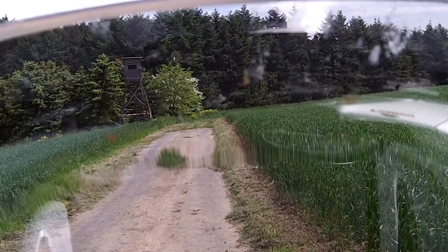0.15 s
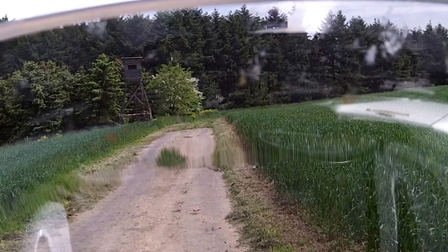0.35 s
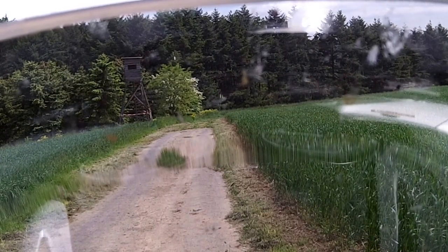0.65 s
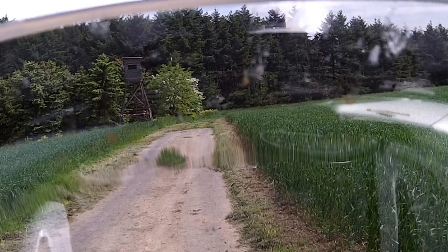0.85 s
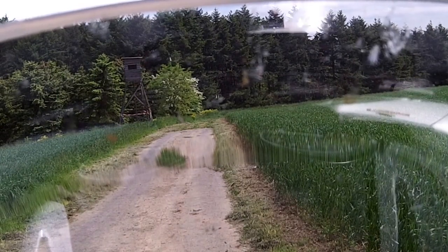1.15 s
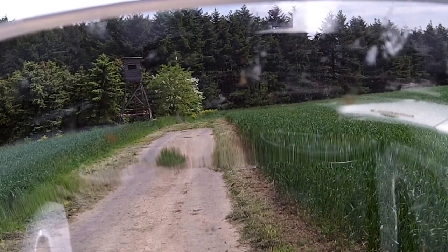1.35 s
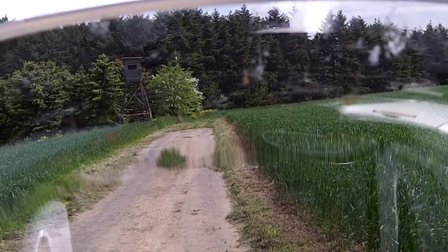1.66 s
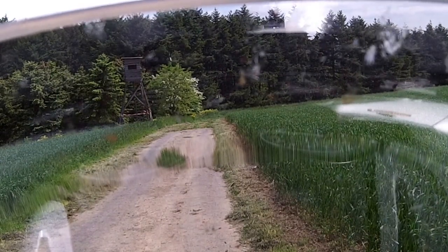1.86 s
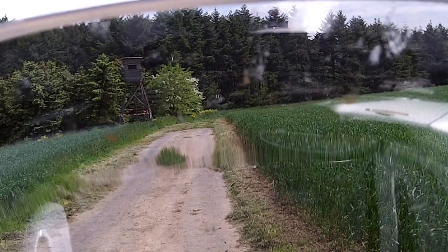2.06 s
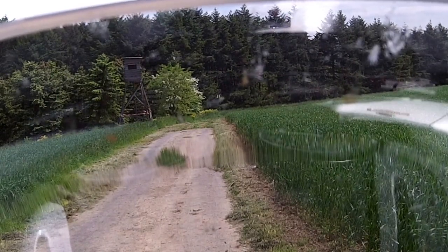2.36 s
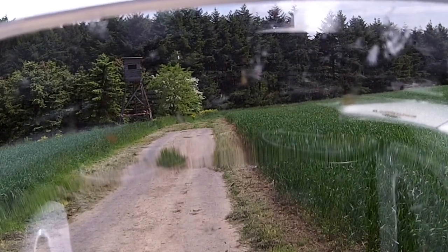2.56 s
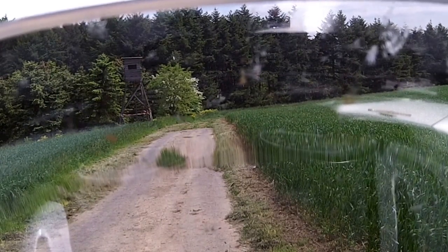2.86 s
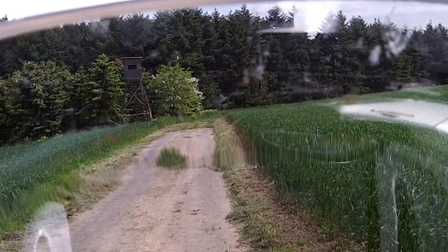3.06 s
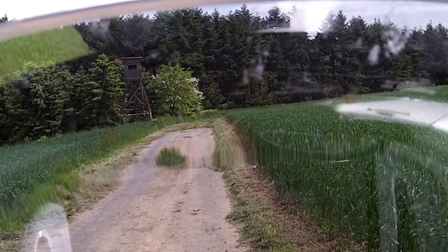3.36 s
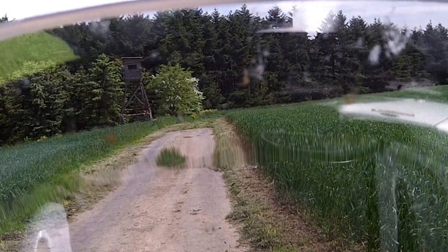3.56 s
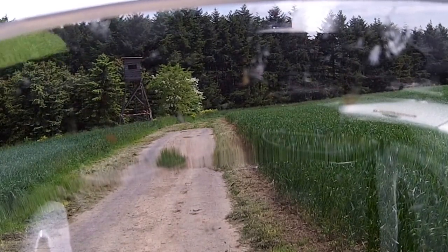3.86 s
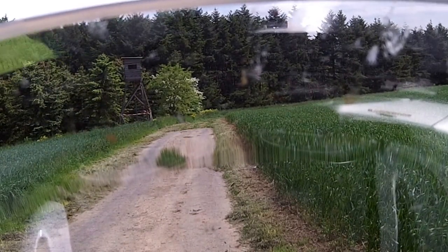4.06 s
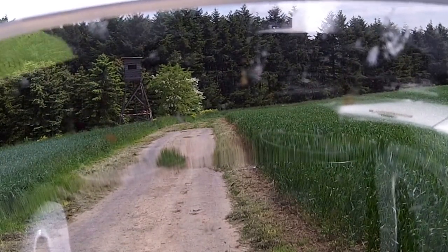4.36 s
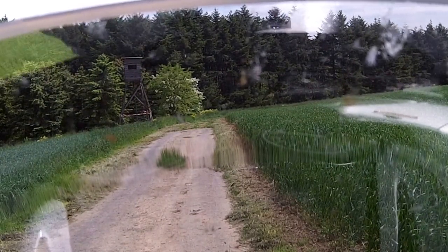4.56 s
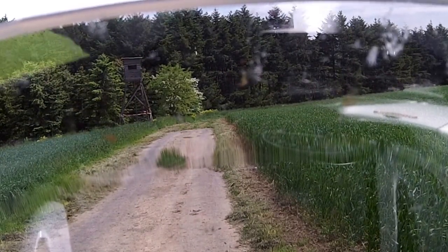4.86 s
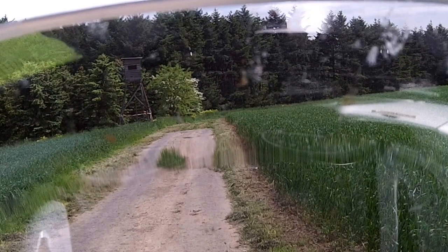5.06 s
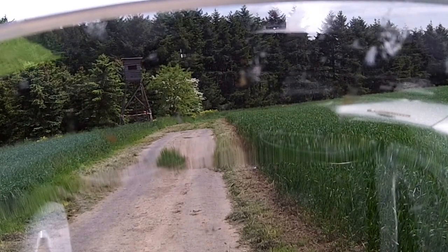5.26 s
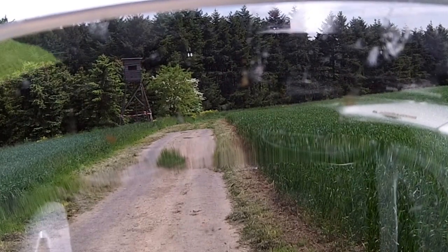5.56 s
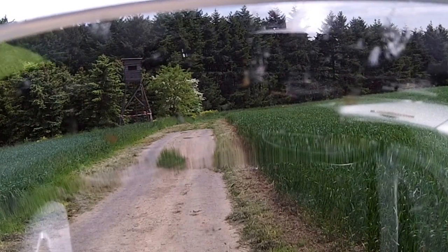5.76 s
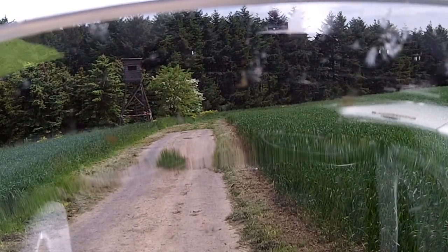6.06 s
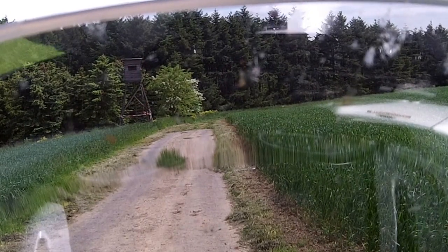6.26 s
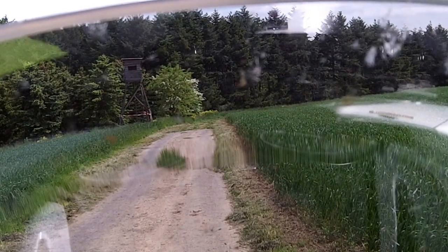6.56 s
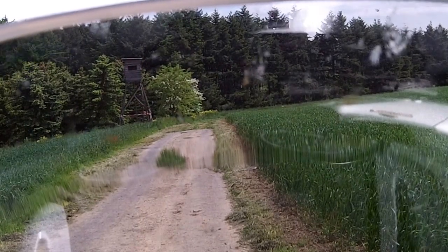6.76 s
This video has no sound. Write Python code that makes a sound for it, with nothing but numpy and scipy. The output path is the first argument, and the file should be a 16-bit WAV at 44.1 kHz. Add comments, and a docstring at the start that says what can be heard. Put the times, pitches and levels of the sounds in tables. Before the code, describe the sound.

A droning motorcycle idle shuts off at a third of the way, a second bike thumps and whines on, then clicks, knocks and near quiet.

```python
"""Three motorcycles idle on a field track, heard through a helmet intercom microphone.
From the start a four-cylinder drones with even pulses through ringing pipes, the rider's twin thumps and
clatters, its fuel pump whines as a set of tones, and a third bike putters softly far away.
The four is switched off and coasts down in gear rattle and thin hiss; the pump squeals in spells.
Knocks and clicks of filtered noise follow, the twin stops too amid more of them, and the far bike putters on."""
import sys
import numpy as np
from scipy import signal
from scipy.fft import rfft, irfft
from scipy.io import wavfile
from scipy.ndimage import uniform_filter1d

SR = 44100
rng = np.random.default_rng(int(sys.argv[2]) if len(sys.argv) > 2 else 0)


def unload_wav(signal):
    """Save mono or channel-first audio to the path in sys.argv[1] as 16-bit WAV at rate SR, clipped to [-1, 1]."""
    wavfile.write(
        sys.argv[1],
        SR,
        np.round(np.clip(np.atleast_2d(signal).T, -1, 1) * 32767).astype(np.int16),
    )


N = 305172
T = np.arange(N) / SR  # time of every sample [s]


def amp(db):
    """Turns decibels into a gain."""
    return 10 ** (np.asarray(db) / 20)


def unit(x):
    """Scales a signal to an rms of 1."""
    return x / np.sqrt(np.mean(x ** 2) + 1e-20)


def curve(rows):
    """Joins rows of (time [s], value) by straight lines."""
    return np.interp(T, *np.transpose(rows))


def since(s):
    """Seconds after a moment, zero before it."""
    return np.maximum(T - s, 0)


def bursts(rows):
    """Smooth swells from rows of (time [s], length [s], level [dB]); overlaps add as power."""
    power = 0
    for s, length, db in rows:
        swell = amp(db) * np.exp(-((T - s) / (length / 2)) ** 2)
        power = power + swell ** 2
    return np.sqrt(power)


def noise():
    """White noise: all pitches equally strong."""
    return rng.standard_normal(N)


def wander(rate_hz, size=8192):
    """A random drift of rms 1; changes much faster than rate_hz are smoothed away."""
    hz = np.fft.rfftfreq(size, T[-1] / size)
    spectrum = rfft(rng.standard_normal(size)) * np.exp(-(hz / rate_hz) ** 2)
    slow = irfft(spectrum)
    return unit(np.interp(T, np.linspace(0, T[-1], size), slow))


def colour(x, points, size=16384):
    """A filter with the given spectrum that looks only backwards, so every blow rings after its onset."""
    f, db = np.transpose(points)
    hz = abs(np.fft.fftfreq(size, 1 / SR))
    log_gain = np.log(amp(np.interp(np.log(hz + 1), np.log(f), db)))
    minimum_phase = np.exp(np.conj(signal.hilbert(log_gain)))
    ring = np.fft.ifft(minimum_phase).real[:size // 2]
    return signal.oaconvolve(x, ring)[:N]


def resonate(x, hz, width, db):
    """One resonance of the given width [Hz], struck by x and set to an rms level [dB]."""
    pole = np.exp((2j * np.pi * hz - np.pi * width) / SR)
    return amp(db) * unit(signal.lfilter([1], [1, -pole], x).imag)


def beats(turns, spread_db, jitter=0):
    """One click at each whole turn, uneven in strength [dB] and, by jitter [s], in time."""
    at = np.flatnonzero(np.diff(np.floor(turns)) > 0)
    strength, slip = rng.standard_normal((1000, 2))[:len(at)].T
    places = at + np.round(slip * jitter * SR).astype(int)
    clicks = np.zeros(N)
    clicks[np.clip(places, 0, N - 1)] = amp(spread_db * strength)
    return clicks


def puffs(clicks, decay_s):
    """A burst of noise that dies away after each click."""
    fading = signal.lfilter([1], [1, -np.exp(-1 / (decay_s * SR))], clicks)
    return noise() * fading


def lobe(turns, centre, width):
    """A smooth bump once a turn; centre and width are parts of a turn."""
    return np.exp((np.cos(2 * np.pi * (turns - centre)) - 1) / (2 * np.pi * width) ** 2)


# hunting idle of the four: (time [s], firing rate [pulses/s])
FOUR_IDLE = [(0, 44.24), (0.1, 45.59), (0.22, 43.75), (0.33, 45.15), (0.52, 43.42), (0.65, 45.12),
             (0.78, 44.22), (1.0, 43.04), (1.17, 44.94), (1.33, 43.83), (1.45, 45.37), (1.56, 43.94),
             (1.65, 45.66), (1.76, 42.72), (1.9, 45.53), (2.04, 43.62), (2.3, 45.34)]
FOUR_OFF_S, FOUR_COAST_S = 2.304, 0.62  # ignition cut; time constant of the slowing crank


def four_turns():
    """Counts the four's firing cycles: idle, then a crank that slows exponentially."""
    coasting = np.exp(-since(FOUR_OFF_S) / FOUR_COAST_S)
    return .215 + np.cumsum(curve(FOUR_IDLE) * coasting) / SR


# sound of the four's exhaust pipe: (frequency [Hz], relative level [dB])
FOUR_PIPE_SPECTRUM = [(12, -6), (25, 0.5), (44, 2), (89, -2.5), (133, -8.5), (178, -10.5), (222, -15),
                      (310, -14), (360, -25.5), (450, -24), (600, -36.5), (1500, -99), (5000, -110)]
# silencer note, struck by every second pulse: (frequency [Hz], width [Hz], level [dB])
SILENCER_RING = (202, 34, -37)
# tailpipe notes, struck by every pulse: (frequency [Hz], width [Hz], level [dB])
TAILPIPE_RINGS = [(307.2, 25, -41.5), (355.6, 14, -51.5), (417, 18, -48)]
# moments when a few strokes burble: (time [s], length [s], level [dB])
BURBLE_SWELLS = [(1.04, .07, -41), (1.68, 0.037, -36), (1.81, .04, -44)]
# the note of the burble: (frequency [Hz], width [Hz])
BURBLE_NOTE = (350, 110)
# sound of the steady rasp: (frequency [Hz], relative level [dB])
RASP_SPECTRUM = [(60, -23), (250, 13.5), (500, 3), (900, 1.5), (1700, 4), (2300, 3.5), (3000, -4.5),
                 (4200, -7.5), (5500, -19), (7500, -57.5)]
# brief swells of the rasp: (time [s], length [s], level [dB])
RASP_BURSTS = [(.19, 0.087, -40), (.52, 0.038, -38), (.72, 0.09, -38), (1.01, 0.097, -37)]
# sound of those swells, brighter than the steady rasp: (frequency [Hz], relative level [dB])
RASP_BURST_SPECTRUM = [(100, 0), (400, 6), (900, 1), (2000, 7), (3000, -2), (4200, -2.5), (5500, -12),
                       (7500, -25)]
FOUR_DB, FOUR_FADE_DB_PER_S = -20, 91  # pipe level, and its fade after the ignition cut
FIRE_OUT_S, RASP_DB = 0.0046, -39  # time constant of the fire going out; steady rasp


def four(pump_hz=150, rasp_depth=0.56, flow_db=-39, lead_share=0.66):
    """Even exhaust pulses ring the pipe, silencer and tailpipe; each carries a puff of rasp."""
    turns, off = four_turns(), since(FOUR_OFF_S)
    level, fire = amp(FOUR_DB - FOUR_FADE_DB_PER_S * off), np.exp(-off / FIRE_OUT_S)
    clicks = beats(turns, spread_db=.9, jitter=.00015)
    running = T < FOUR_OFF_S

    rumble_cut = signal.butter(1, 5, "high", fs=SR, output="sos")
    pipe = signal.sosfilt(rumble_cut, colour(clicks, FOUR_PIPE_SPECTRUM))
    lead = lobe(turns, centre=-.11, width=0.053)  # a small push just ahead of each pulse
    pipe = pipe / pipe[running].std() + lead_share * (lead - lead.mean())
    dull = signal.butter(2, pump_hz, fs=SR, output="sos")
    pumping = signal.sosfilt(dull, pipe)  # what is left once the fire is out

    every_second = np.round(turns) % 2 == 0
    silencer = resonate(clicks * every_second, *SILENCER_RING)
    tailpipe = sum(resonate(clicks, *mode) for mode in TAILPIPE_RINGS)
    burble = bursts(BURBLE_SWELLS) * resonate(clicks, *BURBLE_NOTE, 0)

    gate = lobe(turns, centre=0.042, width=0.12)  # opens just after each pulse
    flow = amp(flow_db) * unit(colour(noise() * gate, FOUR_PIPE_SPECTRUM))  # turbulent gas in the pipe
    flicker = amp(1.1 * wander(rate_hz=40))
    rasp_gate = 1 + rasp_depth * gate
    rasp = amp(RASP_DB) * unit(colour(noise() * rasp_gate * flicker, RASP_SPECTRUM))
    rasp += bursts(RASP_BURSTS) * unit(colour(noise() * rasp_gate, RASP_BURST_SPECTRUM))

    pulses = level * (fire * pipe + (1 - fire) * pumping)
    return pulses + fire * (silencer + tailpipe + burble + flow + rasp)


# hunting idle of the twin: (time [s], firing rate [pulses/s])
TWIN_IDLE = [(0.0, 16.61), (0.07, 17.03), (0.29, 16.69), (0.55, 17.47), (0.77, 16.97), (1.09, 16.8),
             (1.17, 16.35), (1.29, 16.85), (1.43, 15.98), (1.57, 16.23), (1.69, 17.36), (1.83, 16.19),
             (1.89, 16.83), (2.17, 16.66), (2.27, 16.0), (2.43, 17.13), (2.57, 16.21), (2.77, 18.01),
             (2.91, 16.44), (3.07, 17.4), (3.21, 16.33), (3.35, 17.47), (3.49, 16.66), (3.55, 16.84),
             (3.87, 16.13), (3.97, 16.65), (4.17, 15.31), (4.23, 16.54), (4.39, 17.11), (4.47, 16.12),
             (4.63, 17.0), (4.77, 16.51), (4.85, 17.04), (5.07, 16.73), (5.35, 17.35), (5.43, 16.91),
             (5.57, 17.71), (5.71, 16.67), (5.81, 17.2), (5.95, 16.44), (6.05, 16.84), (6.13, 16.27),
             (6.29, 17.18), (6.39, 16.25)]
IDLE_HZ = 16.75  # the twin's usual firing rate
TWIN_OFF_S, TWIN_COAST_S = 6.43, 0.29  # ignition cut; time constant of the slowing crank


def twin_turns():
    """Counts the twin's firing cycles: idle, then a crank that slows exponentially."""
    coasting = np.exp(-since(TWIN_OFF_S) / TWIN_COAST_S)
    return .332 + np.cumsum(curve(TWIN_IDLE) * coasting) / SR


# sound of the twin's exhaust thump: (frequency [Hz], relative level [dB])
THUMP_SPECTRUM = [(8, -2), (17, -23), (34, 2), (50, -10.5), (67, -1), (84, 3.5), (101, -4.5), (120, -14),
                  (145, -22.5), (300, -35), (900, -77), (4000, -105)]
# a steady exhaust note: (frequency [Hz], width [Hz], relative level [dB])
TWIN_EXHAUST_RING = (438, 20, -51)
# hollow pipe notes and valve clacks in every cycle:
# (place in cycle [0-1], frequency [Hz], width [Hz], relative level [dB], roughness [noise per click])
CYCLE_BLOWS = [(0.07, 447.4, 40, -50, 0.45), (0.41, 275, 55, -49.5, 0.44), (0.42, 1710, 220, -59, 1),
               (.54, 1740, 220, -59.5, 1.1), (.64, 2000, 300, -58, 1), (0.84, 423, 40, -55.5, 0.47),
               (.5, 765, 49, -59.5, .8)]
# slow swell of those notes and clacks: (time [s], level [dB])
RING_LEVEL = [(0, 0), (1.0, -0.5), (2.0, 1.5), (3.0, -0.5), (3.9, -1), (4.6, -1.5), (5.1, 2), (5.7, 1.5),
              (6.4, -1.5)]
# sound of the mechanical clatter: (frequency [Hz], relative level [dB])
CLATTER_SPECTRUM = [(60, 1.5), (250, 6.5), (550, 0.5), (760, -1.5), (980, -2), (1400, -1.5), (2400, 0.5),
                    (2900, -4.5), (3400, -5), (3950, -5), (4400, -8), (5100, -9), (5700, -15.5),
                    (6400, -15), (7300, -27)]
# the dying twin sucks air through its intake: (time [s], length [s], level [dB])
INTAKE_GASPS = [(6.462, 0.042, -40.5), (6.512, 0.03, -43.5)]
# the sound of the intake: (frequency [Hz], width [Hz])
INTAKE_BAND = (2000, 720)
THUMP_DB, THUMP_FADE_DB_PER_S = -32.5, 64  # level at the usual idle, and fade after the ignition cut
CLATTER_DB, CLATTER_FADE_DB_PER_S = -41.5, 50


def twin(swish=0.55, tick_db=-9, tick_s=0.001, blow_s=0.0024, push_db=0.6):
    """Thump, hollow rings, valve clacks and clatter, louder by push_db per pulse/s of idle speed."""
    turns, off = twin_turns(), since(TWIN_OFF_S)
    fade = amp(-THUMP_FADE_DB_PER_S * off)
    clatter_level = amp(CLATTER_DB - CLATTER_FADE_DB_PER_S * off)
    push = amp(push_db * (curve(TWIN_IDLE) - IDLE_HZ))
    thump = colour(beats(turns, spread_db=.5, jitter=.0002), THUMP_SPECTRUM)

    rings = resonate(noise(), *TWIN_EXHAUST_RING)
    for place, hz, width, db, rough in CYCLE_BLOWS:
        blows = beats(turns - place, spread_db=1.5, jitter=.00015)
        strike = unit(blows) + rough * unit(puffs(blows, blow_s))
        rings = rings + resonate(strike, hz, width, db)

    ticks = puffs(beats(turns * 8, spread_db=3, jitter=.001), tick_s)  # eight in each cycle
    rub_gate = 1 + swish * lobe(turns, centre=0.55, width=0.27)
    rub = noise() * rub_gate * amp(1.35 * wander(rate_hz=34.0))
    clatter = unit(colour(unit(rub) + amp(tick_db) * unit(ticks), CLATTER_SPECTRUM))

    air = resonate(resonate(noise(), *INTAKE_BAND, 0), *INTAKE_BAND, 0)
    intake = bursts(INTAKE_GASPS) * air
    exhaust = fade * (amp(THUMP_DB) * unit(thump - thump.mean()) + amp(curve(RING_LEVEL)) * rings)
    return push * (exhaust + clatter_level * clatter) + intake


# sound of the far bike's exhaust: (frequency [Hz], relative level [dB])
FAR_SPECTRUM = [(10, -58), (21, -11), (41, -2), (80, 6), (130, -5.5), (200, -18.5), (290, -2.5), (360, -13),
                (460, -25), (1000, -56), (4000, -102)]
# sound of the open air: (frequency [Hz], relative level [dB])
AIR_SPECTRUM = [(20, 4.5), (80, 1), (200, -11), (320, -11), (450, -15.5), (1000, -23), (2600, -27),
                (5000, -36.5), (7000, -52)]
AIR_DB = -39.5
FAR_HZ, FAR_BEAT_S = 20.5, 6.764  # mean firing rate, and the moment of one of its beats


def far_bike(level_db=-43.5, drift=0.124):
    """Soft, nearly even exhaust pulses over a steady noise of open air."""
    away = np.minimum(abs(T - FAR_BEAT_S), 2)  # the beat drifts more away from the known moment
    turns = FAR_HZ * (T - FAR_BEAT_S) + drift * wander(rate_hz=1.0) * away
    putter = colour(beats(turns, spread_db=0.5, jitter=0.00061), FAR_SPECTRUM)
    air = amp(AIR_DB) * unit(colour(noise(), AIR_SPECTRUM))
    return amp(level_db) * unit(putter - putter.mean()) + air


PUMP_HZ, PUMP_PULL, PUMP_LAG_S = 133.23, 2.4, .03  # turns/s at usual idle; pull per pulse/s of idle; delay


def rotor_hz():
    """Fuel pump speed, which follows the twin's idle through the battery voltage, a little late."""
    late_idle = np.interp(T - PUMP_LAG_S, T, curve(TWIN_IDLE))
    return PUMP_HZ + PUMP_PULL * (late_idle - IDLE_HZ)


# spells of squeal: (time [s], length [s], level [dB], hold [0 a chirp each cycle to 1 a held tone])
SQUEAL_SPELLS = [(1.193, 0.036, -35.5, 0.091), (1.366, 0.16, -33.5, 0.2), (1.51, 0.15, -32.5, 0.18),
                 (1.813, 0.092, -39, .09), (2.08, 0.04, -50, .1), (2.228, .18, -34.5, 0.094),
                 (2.573, 0.084, -35.5, 0.058), (3.226, 0.03, -36.5, 0.083), (3.757, 0.25, -41.5, 0.08),
                 (4.02, 0.27, -43, 0.55), (4.082, .14, -39.5, 0.73), (4.298, 0.057, -44, .2),
                 (4.493, .14, -35.5, 0.23), (4.778, 0.095, -38.5, 0.13), (5.095, 0.051, -48, 0.092),
                 (5.962, 0.28, -44, .35), (6.363, 0.079, -49, .5)]
SQUEAL_REST_DB, SQUEAL_EDGE_S = -55.5, 0.025  # level between spells; length of each spell's ramps


def squeal_level():
    """The shrill line is faint, but in spells it rings out, strongest just before each thump."""
    dip = lobe(twin_turns(), centre=0.96, width=0.14)
    level = amp(SQUEAL_REST_DB + 4.1 * wander(rate_hz=74))
    for s, length, db, held in SQUEAL_SPELLS:
        spell = np.clip(np.minimum(T - s, s + length - T) / SQUEAL_EDGE_S + .5, 0, 1)
        level = level + amp(db) * spell * (dip + np.clip(held, 0, 1) * (1 - dip))
    return level


# lowest tone of the whine: (time [s], level [dB])
WHINE_TONE_LEVEL = [(0.0, -49), (0.3, -47), (0.42, -52), (0.57, -46), (0.68, -64), (0.8, -64), (0.88, -48),
                    (1.04, -47), (1.14, -56), (1.33, -56), (1.41, -45.5), (1.53, -57), (1.63, -60),
                    (1.7, -45), (1.77, -44), (1.88, -61), (1.99, -43), (2.06, -45), (2.11, -59),
                    (2.19, -40), (2.31, -59), (2.41, -41.5), (2.52, -50), (2.68, -42), (2.86, -54.5),
                    (3.08, -42), (3.27, -49.5), (3.66, -49.5), (3.83, -60), (4.05, -58), (4.41, -47),
                    (4.52, -53), (4.72, -58), (4.82, -51.5), (5.06, -46.5), (5.68, -51), (5.78, -58),
                    (5.93, -56), (6.08, -53), (6.16, -53), (6.24, -47), (6.42, -53)]
# its overtones: (time [s], 2nd level [dB], 3rd level [dB], 4th level [dB], 5th level [dB])
WHINE_OVERTONES = [(0, -71, -54.5, -59, -68), (2.3, -60, -55.5, -57, -64), (2.45, -56, -52, -55.5, -63),
                   (2.85, -62, -56, -55, -60), (3.15, -65, -51.5, -56, -66), (3.65, -59, -58, -55, -68),
                   (4.1, -61, -55, -66, -65), (4.45, -61, -52, -60, -60.5), (5.5, -55, -53, -58, -62.5),
                   (5.95, -55, -51, -60, -59.5), (6.4, -68, -54, -60, -63)]
# fainter tones of the rotor: (multiples of its speed [1])
FAINT_MULTIPLES = (8, 10, 30)
# and how loud each is: (levels [dB])
FAINT_LEVELS = (-63, -60.5, -63.5)
WHINE_ORDER, SQUEAL_ORDER = 9, 20  # multiples of the rotor speed
HOUSING_HZ, HOUSING_PULL = 2606, .3  # the housing resonance draws the squeal this share of the way
PUMP_STOP_S = 0.016


def pump(flutter=.0016, ripple=0.0039, ripple_at=0.36, shimmer_db=2.5, shake=0.18, shake_at=0.89):
    """Rotor tones (whine, overtones, squeal) waver with every thump and end with the ignition."""
    turns = twin_turns()
    thump_ripple = ripple * np.cos(2 * np.pi * (turns - ripple_at))
    hz = rotor_hz() * (1 + flutter * wander(rate_hz=45) + thump_ripple)
    phase = 2 * np.pi * np.cumsum(hz) / SR

    times, *levels = np.transpose(WHINE_OVERTONES)
    overtones = 0
    for k, db in enumerate(levels, 2):
        level = amp(np.interp(T, times, db) + shimmer_db * wander(rate_hz=22))
        overtones = overtones + level * np.sin(k * WHINE_ORDER * phase)
    overtones = overtones * (1 + shake * np.cos(2 * np.pi * (turns - shake_at)))

    waver_db = 1.5 * wander(rate_hz=20)
    whine = amp(curve(WHINE_TONE_LEVEL) + waver_db) * np.sin(WHINE_ORDER * phase)

    squeal_hz = (1 - HOUSING_PULL) * SQUEAL_ORDER * hz + HOUSING_PULL * HOUSING_HZ
    squeal = squeal_level() * np.sin(2 * np.pi * np.cumsum(squeal_hz) / SR)

    faint = 0
    for k, db in zip(FAINT_MULTIPLES, FAINT_LEVELS):
        faint = faint + amp(db + shimmer_db * wander(rate_hz=18)) * np.sin(k * phase)

    running = np.clip(1 - since(TWIN_OFF_S) / PUMP_STOP_S, 0, 1)
    return np.sqrt(2) * (whine + overtones + squeal + faint) * running  # root 2: levels are rms


# slack gears rattle as the four coasts: (time [s], length [s], level [dB])
GEAR_RATTLE = [(2.42, 0.17, -31)]
# sound of that rattle: (frequency [Hz], relative level [dB])
GEAR_SPECTRUM = [(60, -7), (120, 25.5), (180, 8.5), (300, 5), (600, -3), (1200, -2), (1900, 1),
                 (2800, -6.5), (4800, -12), (7300, -34)]
# a thin hiss lingers: (time [s], length [s], level [dB])
LINGERING_HISS = [(2.8, 1, -52.5)]
# sound of that hiss: (frequency [Hz], width [Hz])
LINGERING_HISS_BAND = (3900, 2300)


def coast_rattle():
    """A short wash of gear noise from the dying four, and a longer thin hiss, both filtered noise."""
    thin = resonate(resonate(noise(), *LINGERING_HISS_BAND, 0), *LINGERING_HISS_BAND, 0)
    rattle = bursts(GEAR_RATTLE) * unit(colour(noise(), GEAR_SPECTRUM))
    return rattle + bursts(LINGERING_HISS) * thin


# stray ticks, and the rider handling the controls:
# (time [s], level [dB], decay time [s], sharpness [0 dull knock to 1 switch click])
HANDLING = [(2.574, -23.5, 0.0024, 0.68), (2.635, -38, .002, .95), (4.43, -41, .002, 0.94),
            (5.24, -46, .002, 0.85), (5.942, -37, .002, .95), (6.156, -24, 0.0058, .04),
            (6.163, -32, 0.024, .02), (6.195, -31, 0.0075, .02), (6.2, -37.5, 0.016, .02),
            (6.321, -42, .012, .4), (6.4, -27, 0.0067, 1), (6.611, -33.5, 0.0069, 0.89),
            (6.656, -34, 0.006, .02), (6.661, -38, 0.022, .01), (6.713, -45, 0.01, 0.71),
            (6.741, -41, 0.042, 0.46), (6.79, -37.5, 0.0055, 0.52), (6.799, -41, .003, .7),
            (6.849, -42, 0.0037, 0.92), (6.91, -35.5, 0.017, 0.14)]
# sound of a dull knock: (frequency [Hz], relative level [dB])
DULL_SPECTRUM = [(100, -16), (400, 1.5), (750, 3), (1300, -2), (2100, -2.5), (2700, -4.5), (3200, -11),
                 (4500, -20), (7000, -44)]
# sound of a sharp click: (frequency [Hz], relative level [dB])
SHARP_SPECTRUM = [(200, -18), (1000, -30), (2600, 5.5), (3600, 6), (4300, 2), (5000, 4), (5700, -2),
                  (7200, -11), (13000, 3.5)]
# notes of the plastic in a dull knock: (frequency [Hz], relative level [dB], time to fall 60 dB [s])
PLASTIC_MODES = [(660, -9.5, 0.14), (790, -11.5, 0.071), (1180, -7, 0.08), (1278, -7.5, 0.094),
                 (1730, -8, 0.1), (2190, -11, .08), (3530, -22, 0.039)]


def knocks():
    """Short bursts of noise with ringing plastic, from dull knocks to sharp switch clicks."""
    dull, sharp = unit(colour(noise(), DULL_SPECTRUM)), unit(colour(noise(), SHARP_SPECTRUM))
    out = np.zeros(N)
    for s, db, decay, sharpness in HANDLING:
        start = round(s * SR)
        span = slice(start, start + SR // 5)
        age, share = T[span] - T[span][0], np.clip(sharpness, 0, 1)
        rise_s = .001 - .0007 * share  # sharper clicks start faster
        body = np.sqrt(1 - share) * dull[span] + np.sqrt(share) * sharp[span]
        ring = 0
        for hz, mode_db, t60 in PLASTIC_MODES:
            ring = ring + amp(mode_db - 60 * age / t60) * np.sin(2 * np.pi * hz * age)
        rise = 1 - np.exp(-age / rise_s)
        out[span] += amp(db) * rise * (np.exp(-age / decay) * body + (1 - share) * ring)
    return out


def scene():
    """All three bikes and the rider's hands, as one channel."""
    return (four() + coast_rattle() + twin() + far_bike() + pump() + knocks())[None]


def gain_control(x, threshold_db=-27, slope=0.43, window_s=0.075, treble_weight=.8):
    """Turns everything down by slope dB per dB above the threshold; shrill sounds count extra."""
    treble = signal.sosfilt(signal.butter(2, 2000, "high", fs=SR, output="sos"), x[0])
    power = uniform_filter1d(x[0] ** 2 + treble_weight * treble ** 2, round(window_s * SR))
    excess_db = np.maximum(10 * np.log10(abs(power) + 1e-12) - threshold_db, 0)
    return x * amp(-slope * excess_db)


def low_pass(x, hz):
    """Cuts steeply above one frequency."""
    taps = signal.firwin(401, hz, window=("kaiser", 8), fs=SR)
    return signal.oaconvolve(x, taps[None], "same")


# sound of the faint hiss: (frequency [Hz], relative level [dB])
HISS_SPECTRUM = [(7000, -64), (8300, -3.5), (9000, 7), (9700, 11), (10700, 5), (12000, 11), (14000, 4),
                 (15000, 0)]
HISS_DB = -71
BAND_EDGE_HZ, TOP_EDGE_HZ = 7350, 15050  # edge of the main band; edge of the quiet treble above it


def record(dry, treble_db=-22):
    """Gain control, a steep band edge with a little quiet treble above it that follows the loudness, and hiss."""
    rumble_cut = signal.butter(1, 2, "high", fs=SR, output="sos")
    held = gain_control(signal.sosfilt(rumble_cut, dry))
    heard = low_pass(held, BAND_EDGE_HZ) + amp(treble_db) * held
    hiss = amp(HISS_DB) * unit(colour(noise(), HISS_SPECTRUM))
    return low_pass(heard + hiss, TOP_EDGE_HZ)


dry = scene()
out = record(dry)
unload_wav(out)
```